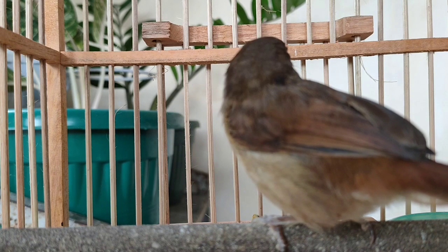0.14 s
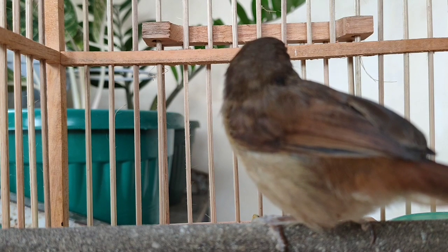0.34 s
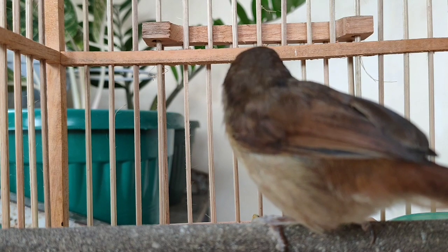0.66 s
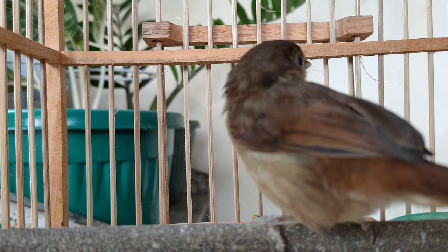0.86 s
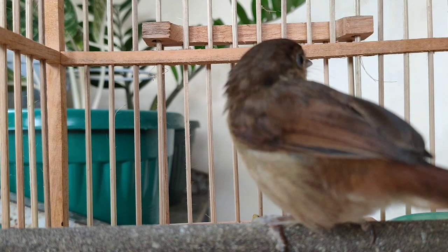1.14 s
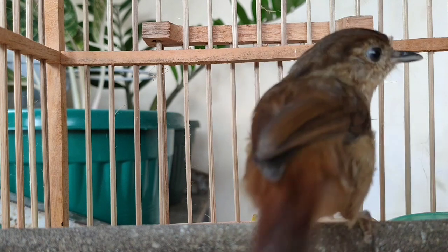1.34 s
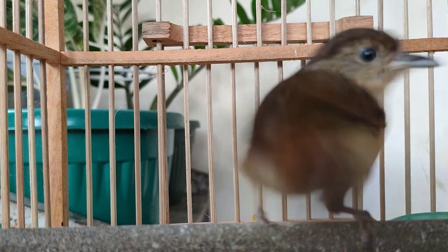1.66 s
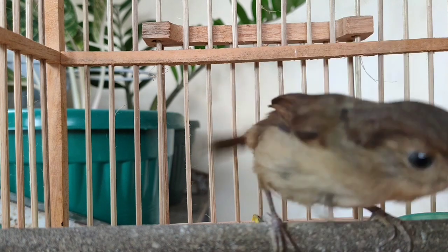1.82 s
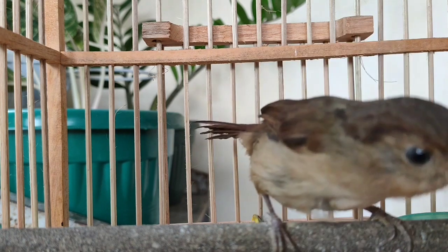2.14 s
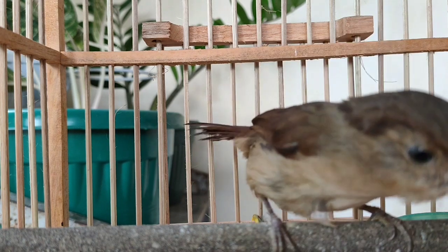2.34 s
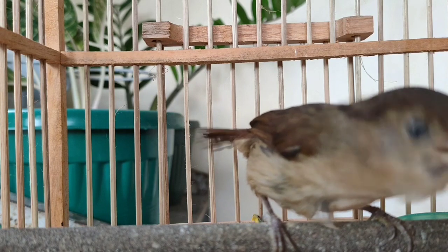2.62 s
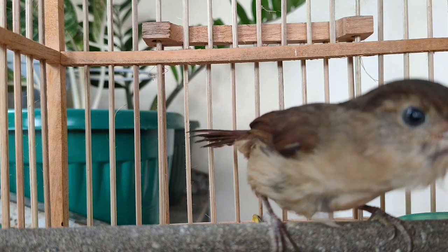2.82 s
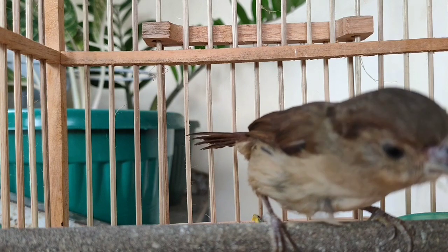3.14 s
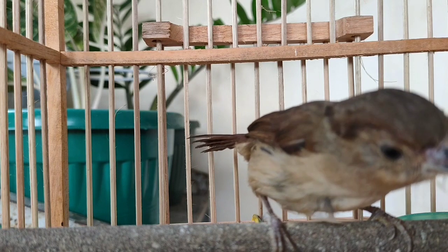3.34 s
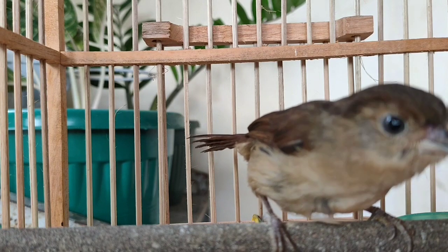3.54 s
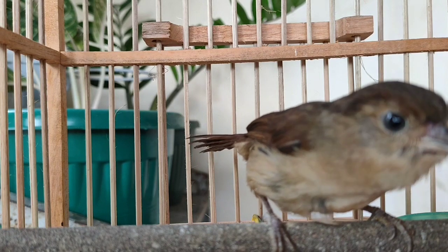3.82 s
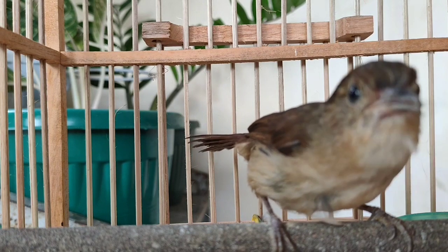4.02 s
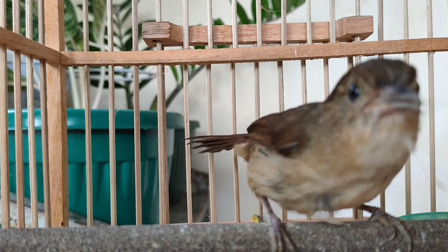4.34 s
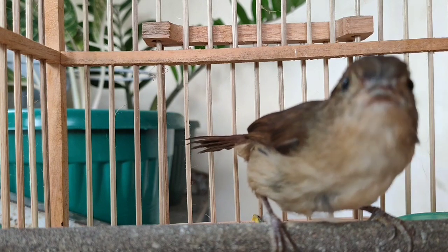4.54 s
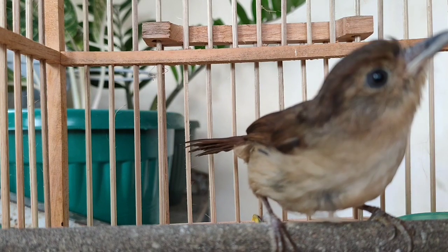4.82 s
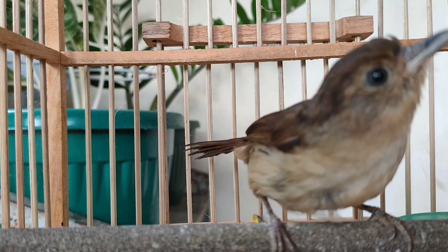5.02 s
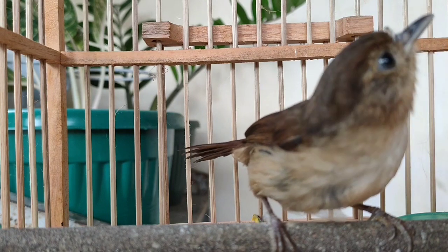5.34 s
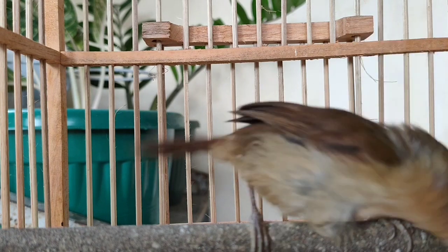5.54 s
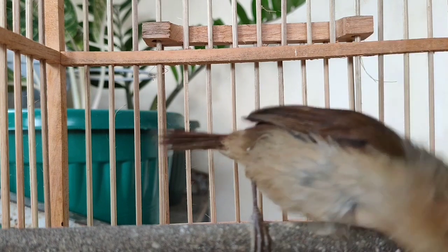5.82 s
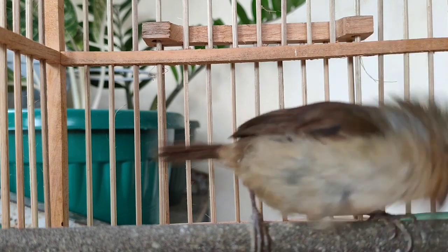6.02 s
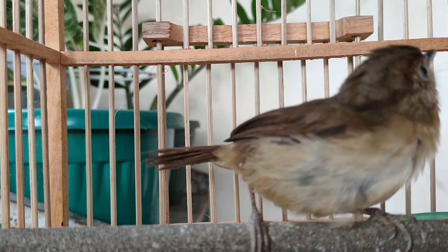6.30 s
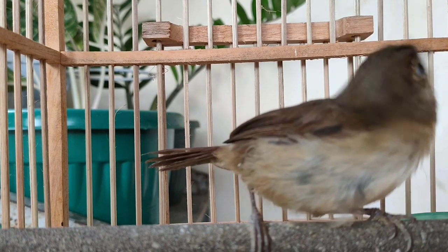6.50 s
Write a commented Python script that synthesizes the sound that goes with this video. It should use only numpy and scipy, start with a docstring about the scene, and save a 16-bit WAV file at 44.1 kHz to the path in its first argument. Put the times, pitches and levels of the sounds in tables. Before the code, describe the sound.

Quiet opening with a faint low background, hoarse calls far away, soft whistles and the bird's feathers and feet shuffling on its perch. Suddenly the close bird sings a dazzling loud rattle ending in two buzzes, pauses, then sings a second, ending in three. The porch answers briefly. Afterwards only muffled regular hammering remains, with tiny cage ticks, the last setting a wire ringing.

```python
"""A small caged bird, a hand's width from the microphone, sings two loud rattling trills that end in buzzes.
Its voice is a gliding tone with two overtones, made directional by the beak and followed by a lingering diffuse
tail. Soft sinking whistles (sines), rustles (shaped noise) and far hoarse calls (period-doubled tones) come
before. Slow hammer blows are low noise with wall resonances; a low tone swells briefly under the first trill.
Noise ticks sound on the cage, the last with a ringing wire, over a faint steady noise."""
import sys
import numpy as np
from scipy import signal
from scipy.fft import rfft, irfft, next_fast_len
from scipy.io import wavfile
from scipy.ndimage import uniform_filter1d, map_coordinates

SR = 44100
rng = np.random.default_rng(int(sys.argv[2]) if len(sys.argv) > 2 else 0)


def to_wav(s):
    """Save 16-bit WAV."""
    ch = np.atleast_2d(s).T  # columns
    pcm = np.round(np.clip(ch, -1, 1) * 32767)  # PCM
    wavfile.write(sys.argv[1], SR, pcm.astype(np.int16))


N = 294147
T = np.arange(N) / SR  # time axis (s)


def syrinx(hz, second_db, third_db, jitter):
    """Harmonic synthesis: a nearly pure tone with two overtones and a slightly unsteady pitch."""
    phase = phase_of(hz * (1 + jitter * wobble(900, len(hz))))
    second = amp(second_db) * np.sin(2 * phase)
    third = amp(third_db) * np.sin(3 * phase)
    return np.sin(phase) + second + third


# Trill notes, each a low slur that leaps into an arch: [leap t/s, slur top f/Hz, relative level/dB]
TRILL_NOTES = [(2.33, 2504, -6.5), (2.377, 2700, -2.5), (2.4444, 3702, 3), (2.514, 3837, 3),
               (2.559, 3272, 1.5), (2.635, 3577, 2.5), (2.68, 3268, .5), (2.755, 3558, 0.5),
               (2.800, 3175, -0.5), (2.871, 3517, 0), (2.915, 2830, -1), (2.991, 3058, -1),
               (3.025, 2571, -2.5), (3.842, 2410, -6), (3.891, 2468, -4.5), (3.940, 2536, -1),
               (4.012, 2645, 0.5), (4.088, 2940, -0.5), (4.135, 2654, -2.5), (4.214, 3084, -1),
               (4.261, 2699, -1), (4.314, 2687, -1.5), (4.397, 3170, 0.5), (4.443, 2984, -1.5),
               (4.481, 2649, -1.5)]
MID_HZ = 3000  # slur top at which the next two lines hold as they stand
SLUR_S, FOOT_HZ, HURRY = .023, 2330, .7  # length, highest starting pitch; power by which higher slurs are quicker
LEAP_HZ, LEAP_SHRINK = 3193, .3  # height of the arch over the slur top; Hz lost per Hz of higher slur
ARCH_DB, FORCED_DB = -15.5, 8.5  # arch against slur; what it gains in a forced note
FORCED_FROM_HZ, FORCED_SPAN_HZ = 3233, 620  # slur tops over which notes become forced
PAUSE_S = .06  # a longer gap between leaps starts a new group of notes
SCOOP_HZ, SCOOP_S = 1295, 0.0038  # the first note of a group scoops up from this far below, this quickly
TURN_S = 3.6  # when the beak turns towards the microphone (s)
FACING_ARCH_DB = -5.5  # the crests of the second trill are softer


def rattle(climb_share=.88, hold=0.0013, arch=.019, rise=0.011, release=0.0029, swell_db=5, droop_db=1):
    """Frequency modulation: each note slurs up and leaps through an arch; only high notes keep force there."""
    voice = np.zeros(N)
    gaps = np.diff([note[0] for note in TRILL_NOTES], prepend=0)
    for (s, top_hz, db), gap in zip(TRILL_NOTES, gaps):
        slur = min(SLUR_S * (MID_HZ / top_hz) ** HURRY, gap - arch)  # waits for the last arch to end
        climb = climb_share * slur
        foot_hz = min(FOOT_HZ, .88 * top_hz)  # notes with a low top start lower
        crest_hz = top_hz + LEAP_HZ - LEAP_SHRINK * (top_hz - MID_HZ)
        arch_db = ARCH_DB + FORCED_DB * ease((top_hz - FORCED_FROM_HZ) / FORCED_SPAN_HZ)
        t = np.arange(-slur - release / 2, arch + release, 1 / SR)  # the leap is at t = 0
        u = np.clip(t / arch, 0, 1)  # progress through the arch
        height = np.sin(np.pi * u ** 0.95)
        base = foot_hz + (top_hz - foot_hz) * ease((t + climb) / (climb - hold)) * (1 - u)
        scoop = SCOOP_HZ * np.exp(-((t - t[0]) / SCOOP_S) ** 2) * (gap > PAUSE_S)
        hz = base - scoop + (crest_hz - (top_hz + foot_hz) / 2) * height
        level = db - swell_db * ease(-t / slur) + arch_db * ease(t / 0.0056) - droop_db * u ** 2
        level = level + FACING_ARCH_DB * height * (s > TURN_S)
        gate = ease((t - t[0]) / rise) * ease((t[-1] - t) / release)
        tone = syrinx(hz, second_db=-35, third_db=-35, jitter=.005)
        add(voice, s + t[0], gate * amp(level + 2.5) * tone)
    return voice


# Buzzes: [first crest t/s, length t/s, first mean f/Hz, last mean f/Hz, relative peak level/dB,
#          overtone level/dB before effort, warble and beak act on it]
BUZZ_NOTES = [(3.046, 0.062, 3800, 4253, 4.5, -15.5), (3.163, .076, 3417, 4810, 3.5, -1.5),
              (4.494, 0.028, 3890, 3686, 1, -25.5), (4.566, .076, 3667, 4837, 4, 2),
              (4.7052, .073, 3607, 4854, 1.5, 4.5)]
WARBLE_HZ = 118.3  # mean warble rate in every buzz
SWING_HZ = 913  # scale of the pitch swing, which widens from 0.77 to 1.34 times this
SWELL_DB_PER_S = 174.5  # the longer a buzz, the more it swells
BUZZ_RELEASE_S = .008  # a buzz stops almost at once
BEAK_HZ, BEAK_HALF_WIDTH_HZ = 7100, 1600  # resonance of the open beak; offset at which its amplitude is half


def buzz(lead=0.0023, peak_at=0.71, throb_db=6.5, brighten=0.94, push_lag=0.15, downstroke_db=4, trough_db=4):
    """Coupled frequency and amplitude modulation: pitch troughs carry the soft start, crests the hard end."""
    voice = np.zeros(N)
    for s, length, first_hz, last_hz, peak_db, over_db in BUZZ_NOTES:
        t = np.arange(-lead, length, 1 / SR)
        u = np.clip(t / length, 0, 1)
        stumble = .3 * wobble(150, len(t))  # uneven warble (rad)
        cycle = 2 * np.pi * WARBLE_HZ * t + stumble
        swing_hz = SWING_HZ * np.cos(cycle) * (0.77 + 0.57 * u)
        hz = first_hz + (last_hz - first_hz) * u ** 1.4 + swing_hz
        effort_db = SWELL_DB_PER_S * length * (ease(u / peak_at) - 1)
        crest_pulse_db = throb_db * (np.cos(cycle - push_lag) - 1) * 1.37 * u
        trough_pulse_db = trough_db * np.cos(cycle) * (1 - u)
        ragged_db = 2 * wobble(700, len(t))
        level = peak_db + effort_db + crest_pulse_db - trough_pulse_db + ragged_db
        beak = 1 / (1 + ((2 * hz - BEAK_HZ) / BEAK_HALF_WIDTH_HZ) ** 2)  # acts on the second harmonic
        second_db = over_db + brighten * effort_db + downstroke_db * np.sin(cycle) + 20 * np.log10(beak)
        gate = ease((t + lead) / .004) * ease((length - t) / BUZZ_RELEASE_S)
        tone = syrinx(hz, second_db, second_db - 17, jitter=.024)
        add(voice, s - lead, gate * amp(level) * tone)
    return voice


def beamed(x, pose):
    """Directivity: the beak sends each frequency to the two ports with its own strength and phase."""
    def response(hz):
        left, right, lead = (along(np.array(pose)[:, [0, k]], hz) for k in range(1, 4))
        return np.array([amp(left) * np.exp(.5j * lead), amp(right) * np.exp(-.5j * lead)])
    return filtered(x, response)


# Throat and beak as heard at the two ports, head turned aside, then beak towards the microphone:
# [f/Hz, left level/dB, right level/dB, left phase lead/rad]
HEAD_ASIDE = [(1560, -37, -33, -8), (2332, -15.5, -15, -0.36), (2780, -21.5, -11.5, -1.5),
              (3080, -6.5, -5.5, 1), (3380, -7, -11, -1), (3880, -7, -7.5, -2.5), (4405, -10, -8.5, 2.5),
              (5400, -1.5, -9.5, -2.5), (6500, -8, -23, 2.5), (6700, 0.5, -6.5, -2.5), (7880, -5.5, 0, 9),
              (13000, -23.5, -8.5, -4.5), (15030, -14, -22, -8)]
HEAD_FACING = [(1500, -37, -20.5, 1.5), (2400, -17.5, -14, -1.36), (2613, -15, -13.5, -2),
               (2902, -21, -4.5, -2.5), (3000, -11, -8.5, 0.36), (3246, -4, -10.5, -1.5),
               (3476, -6, -13.5, -2), (3970, -8.5, -3, -3), (5544, -7.5, -8.5, -2), (6300, -1, -6.5, -4),
               (8500, -16.5, -2, -4.5), (11100, -27.5, -18, 8), (15500, -26, -12.5, -10)]
# Voice as it feeds the reflections and the lingering tail: [f/Hz, level/dB]
SPREAD_TONE = [(1500, -28), (2300, -17), (2700, -13), (3200, -10), (3900, -13.5), (5100, -9.5), (6400, -7.5),
               (7500, -8.5), (9500, -16.5), (12000, -18), (15500, -18.5)]
# Decay of the lingering tail: [f/Hz, time to fall 60 dB t/s]
TAIL_DECAY = [(200, .6), (3000, 0.45), (6000, 0.42), (15000, 0.54)]
# Spectra of the air noise, the fizz of loud notes and the rasp of buzzes: [f/Hz, relative density level/dB per Hz]
AIR_SPECTRUM = [(20, -25.5), (55, -7.5), (120, 0), (500, -6), (1000, -7.5), (1800, 2.5), (4000, -2.5),
                (9000, -6.5), (11000, -27.5), (15600, -23)]
FIZZ_SPECTRUM = [(5000, -10.5), (9000, -3.5), (11000, -11.5), (13000, 0), (14500, -11.5), (15600, 7.5)]
RASP_SPECTRUM = [(2000, -18), (4000, -12), (6800, 7), (9000, -6.5), (11000, -5), (14000, -15.5),
                 (15500, -13.5)]
FIZZ_DB, FIZZ_GROWS = -17, 1.4  # gain of the fizz; the power of the voice with which it grows
RASP_DB, RASP_FROM_HZ = -19, 6000  # rasp against the buzz treble above this frequency


def trills():
    """Direct and reflected sound: air noise follows the voice, loud notes fizz, buzzes rasp, a diffuse tail
    lingers."""
    buzzes = buzz()
    voice = rattle() + buzzes
    near = beamed(voice * (T < TURN_S), HEAD_ASIDE) + beamed(voice * (T >= TURN_S), HEAD_FACING)
    outward = filtered(voice, lambda hz: amp(along(SPREAD_TONE, hz)))
    air = amp(-23.0) * strength(outward) * noise(AIR_SPECTRUM)
    fizz = amp(FIZZ_DB) * strength(outward) ** FIZZ_GROWS * noise(FIZZ_SPECTRUM)
    buzz_treble = filtered(buzzes, lambda hz: hz > RASP_FROM_HZ)
    rasp = amp(RASP_DB) * strength(buzz_treble) * noise(RASP_SPECTRUM)
    hiss = air + fizz + rasp
    spread = outward + 2.1 * hiss
    early = amp(-9.0) * walls(spread)
    late = amp(-12.5) * echo(spread, TAIL_DECAY, onset=0.0013)
    return near + hiss + early + late


# Thin whistle notes: [start t/s, length t/s, level/dB before direct and echo gains]
WHISTLE_NOTES = [(0.738, 0.16, -57.5), (0.985, 0.22, -57.5), (1.243, 0.29, -52.5), (1.566, 0.23, -53),
                 (1.896, 0.15, -59.5)]
WHISTLE_HZ = 3329  # start of each note
REST_HZ, REST_SAG_HZ_PER_S = 3165, 175  # where the first note settles; how that rest sinks


def whistle(settle=0.07):
    """Pitch relaxation: five soft sines each sink to a lower rest than the last, heard mostly off the walls."""
    voice = np.zeros(N)
    for s, length, db in WHISTLE_NOTES:
        t = np.arange(0, length, 1 / SR)
        rest_hz = REST_HZ - REST_SAG_HZ_PER_S * (s - WHISTLE_NOTES[0][0])
        hz = rest_hz + (WHISTLE_HZ - rest_hz) * np.exp(-(t / settle) ** 1.5)
        gate = ease(t / 0.031) * ease((length - t) / .06)
        add(voice, s, amp(db) * gate * np.sin(phase_of(hz)))
    return amp(-4.5) * voice + amp(4.5) * echo(voice, [(3000, 0.55)], onset=.01)


# Feather swishes, then feet shuffling on the perch: [peak t/s, rise t/s, fall t/s, level/dB before flicker]
FEATHER_SWISHES = [(.27, 0.04, 0.44, -71.5), (.74, 0.15, 0.17, -61.5), (1.5, .04, 0.11, -71.5),
                   (1.73, 0.2, 0.25, -62.5)]
FOOT_STEPS = [(1.385, 0.014, 0.036, -87), (1.5, 0.056, 0.14, -76), (1.7, 0.26, .25, -68),
              (1.88, 0.037, 0.23, -64), (2.3, .06, 0.22, -72.5)]
# Spectra of feathers and of shuffling feet: [f/Hz, relative density level/dB per Hz]
FEATHER_SPECTRUM = [(800, -21.5), (2100, -2.5), (3000, -8.5), (4000, -14.5), (6800, 2), (9000, -2.5),
                    (13000, -28), (15500, -32)]
SHUFFLE_SPECTRUM = [(29, -53), (50, -10), (298, -5), (388, -16), (728, -7.5), (1120, -28.5), (2600, -24),
                    (3380, -42), (5720, -120)]
FADE_DB = 15  # a rustle is this much weaker one rise before or one fall after its peak


def swells(events):
    """Gaussian envelope: a gain that rises and falls in a bell around each event."""
    gain = np.zeros(N)
    for s, rise, fall, db in events:
        distance = (T - s) / np.where(T < s, rise, fall)
        gain += amp(db - FADE_DB * distance ** 2)
    return gain


def rustle():
    """Friction noise: feathers brush and feet shuffle as the bird turns on its perch."""
    feathers = swells(FEATHER_SWISHES) * amp(2.6 * wobble(60, N)) * noise(FEATHER_SPECTRUM)
    feet = swells(FOOT_STEPS) * amp(4.8 * wobble(26, N)) * noise(SHUFFLE_SPECTRUM)
    return feathers + feet


# Claws and beak on the cage: [t/s, level/dB before the decay]
CAGE_TICKS = [(5.655, -57.5), (6.055, -60.5), (6.139, -40)]
# Modes of the cage wire: [f/Hz, level/dB before onset and decay, time to fall 60 dB t/s]
WIRE_MODES = [(5680, -50.5, 0.65), (6000, -41.5, 0.87), (6680, -54.5, 0.74), (6400, -46, 0.88),
              (6360, -62, 0.79)]


def cage():
    """Impact and modal ringing: light noise ticks, the last of which sets a wire ringing."""
    out, t = np.zeros((2, N)), np.arange(SR) / SR
    for s, db in CAGE_TICKS:
        scratch = noise([(1500, -18.5), (6000, -1), (15000, -12.5)], size=SR)
        add(out, s, amp(db - 60 * t / 0.035) * ease(t / .004) * scratch)
    for hz, db, t60 in WIRE_MODES:
        shiver = np.array([wobble(160, SR), wobble(160, SR)])  # phase unsteadiness at each port
        mode = np.sin(2 * np.pi * hz * t + 2 * shiver)
        add(out, CAGE_TICKS[-1][0], amp(db - 60 * t / t60) * ease(t / 0.059) * mode)
    return out


# Hammer blows: [t/s, level/dB before the swell and decay]
HAMMER_BLOWS = [(2.47, -53), (2.89, -45), (3.344, -49), (3.70, -46.5), (4.035, -42), (4.365, -40.5),
                (4.745, -41.5), (5.165, -47), (5.622, -40.5), (6.032, -40.5), (6.445, -42.5)]
# Spectrum of the thud: [f/Hz, relative density level/dB per Hz]
THUD_SPECTRUM = [(22, -28.5), (40, -21), (60, -7), (100, -2), (150, -9), (200, -1.5), (320, -1.5),
                 (450, -5.5), (700, -10.5), (1100, -16), (2300, -20.5), (3800, -39), (8000, -37.5),
                 (12000, -65)]
# Resonances between the walls: [f/Hz, relative level/dB]
YARD_MODES = [(193.8, -55), (279.9, -58.5), (317.6, -61), (425.3, -58)]


def hammering(swell=0.079, hold=0.14, t60=0.94, ring_db=49, lag=0.00028):
    """Multipath smearing: every blow takes the same detour between walls, so each is the same soft thud."""
    t = np.arange(SR) / SR
    ring = np.zeros(SR)
    for hz, db in YARD_MODES:
        ring += amp(db + ring_db) * np.sin(2 * np.pi * hz * t + 0.48 * wobble(16, SR))
    envelope = np.minimum(t / swell, 1) * amp(-60 * np.maximum(t - hold, 0) / t60)
    thud = unit(noise(THUD_SPECTRUM, size=SR) + ring) * envelope
    out = np.zeros((2, N))
    for s, db in HAMMER_BLOWS:
        add(out[0], s + lag, amp(db) * thud[0])  # the left port is farther away
        add(out[1], s, amp(db) * thud[1])
    return out


# Far animal calls: [start t/s, length t/s, first f/Hz, last f/Hz, level/dB before flutter and room,
#                    gain of the overtone set/dB]
FAR_CALL_NOTES = [(0, .28, 712, 660, -60.5, 3), (0.682, 0.16, 954, 867, -60, -23),
                  (1.717, 0.26, 747, 715, -62, -18), (2.1, .2, 723.5, 775, -78.5, -25)]
# Overtones of the far calls: [multiple of the pitch, level/dB before the overtone gain]
CALL_OVERTONES = [(1.5, -9), (2, -9), (2.5, -15.5), (3, -3.5), (3.5, -18.5)]
HOARSE, FLUTTER_DB = .016, 4.5  # scale of the unsteadiness of pitch (share) and of level


def far_calls():
    """Period doubling: distant hoarse calls carry lines between their harmonics, heard mostly as echo."""
    voice = np.zeros(N)
    for s, length, first_hz, last_hz, db, over_db in FAR_CALL_NOTES:
        t = np.arange(0, length, 1 / SR)
        glide_hz = first_hz + (last_hz - first_hz) * (t / length) ** 0.62
        phase = phase_of(glide_hz * (1 + HOARSE * wobble(230.0, len(t))))
        overtones = sum(amp(level) * np.sin(k * phase) for k, level in CALL_OVERTONES)
        flutter = amp(FLUTTER_DB * wobble(170, len(t)))
        gate = ease(t / 0.0067) * ease((length - t) / 0.026) * flutter
        add(voice, s, amp(db) * gate * (np.sin(phase) + amp(over_db) * overtones))
    return 0.28 * voice + echo(voice, [(1000, 0.28)], onset=0.0047)


# A brief low hum: [start t/s, length t/s, f/Hz, peak level/dB]
HUM_TONES = [(2.74, .17, 208, -53)]


def hum():
    """Pure tone in a half-sine envelope: a low sound swells and fades under the first trill."""
    out = np.zeros(N)
    for s, length, hz, db in HUM_TONES:
        envelope = np.sin(np.pi * np.clip((T - s) / length, 0, 1))
        out += amp(db) * envelope * np.sin(2 * np.pi * hz * T)
    return out


# Spectrum of the background: [f/Hz, relative density level/dB per Hz]
FLOOR_SPECTRUM = [(20, -2.5), (50, -2.5), (110, -12.5), (250, -13.5), (1000, -31.5), (4000, -27.5),
                  (9000, -30.5), (16000, -38.5)]


def background():
    """Stationary noise: a faint, mostly low sound that never changes level."""
    return amp(-75.5) * noise(FLOOR_SPECTRUM)


def walls(x, count=14, nearest=.004, farthest=0.044, t60=0.11):
    """Early reflections: separate weak copies from the floor and nearby walls, different at each port."""
    delays = rng.uniform(nearest, farthest, (2, count))
    taps = np.zeros((2, SR // 4))
    for port, delay in enumerate(delays):
        taps[port, (delay * SR).astype(int)] = amp(-60 * delay / t60) * rng.choice([-1, 1], count)
    taps = taps / np.linalg.norm(taps, axis=1, keepdims=True)
    return signal.fftconvolve(x, taps, axes=1)[:, :N]


def echo(x, decay, onset):
    """Reverberation: a diffuse stereo answer of walls in which each frequency dies at its own speed."""
    hz, t, z = signal.stft(rng.standard_normal((2, SR)), SR, nperseg=256)
    fading = z * amp(-60 * t / along(decay, hz)[:, None])
    tail = signal.istft(fading, SR, nperseg=256)[1]
    tail = tail * ease(np.arange(tail.shape[1]) / SR / onset)
    return signal.fftconvolve(np.atleast_2d(x), tail / np.linalg.norm(tail[0]), axes=1)[:, :N]


# Stereo width of diffuse sound: [f/Hz, side over mid amplitude ratio]
DIFFUSE_WIDTH = [(60, 0.47), (250, 0.14), (500, 0.43), (1500, 0.72), (5000, 0.97)]


def noise(spectrum, size=N):
    """Diffuse field: coloured stereo noise of rms 1, nearly mono in the bass."""
    mid, side = filtered(rng.standard_normal((2, size)), lambda hz: amp(along(spectrum, hz)))
    side = filtered(side, lambda hz: along(DIFFUSE_WIDTH, hz))
    return unit(np.array([mid + side, mid - side]))


def strength(x):
    """Envelope detection: running rms of a mono sound."""
    return np.sqrt(np.abs(uniform_filter1d(x ** 2, size=100)))


def filtered(x, response):
    """Linear filtering: x times a complex response of frequency."""
    n = x.shape[-1]
    m = next_fast_len(n + 8192)
    return irfft(rfft(x, m) * response(np.fft.rfftfreq(m, 1 / SR)), m)[..., :n]


def wobble(rate, size):
    """Band-limited randomness: a smooth random curve, rate knots a second."""
    knots = rng.standard_normal(int(size * rate / SR) + 4)
    return map_coordinates(knots, [np.arange(size) * rate / SR])


def phase_of(hz):
    """Phase (rad) as the running integral of frequency."""
    return 2 * np.pi * np.cumsum(hz) / SR


def along(points, hz):
    """Logarithmic interpolation of (Hz, value) points along frequency."""
    f, v = np.transpose(points)
    return np.interp(np.log(hz + 1), np.log(f + 1), v)


def ease(u):
    """Raised-cosine transition from 0 to 1."""
    return np.sin(np.pi / 2 * np.clip(u, 0, 1)) ** 2


def amp(db):
    """Decibel law: level to amplitude ratio."""
    return 10 ** (np.asarray(db) / 20)


def unit(x):
    """Power normalization to rms 1."""
    return x / np.sqrt(np.mean(x ** 2) + 1e-20)


def add(track, s, sound):
    """Superposition: mix a sound into a track at time s."""
    i = max(round(s * SR), 0)
    track[..., i:i + sound.shape[-1]] += sound[..., :max(N - i, 0)]


def scene():
    """Superposition of all sources, from the near bird to the background."""
    bird = trills() + whistle() + rustle() + cage()
    return bird + hammering() + far_calls() + hum() + background()


TOP_HZ = 15900  # band limit


def record(dry, hardness=8):
    """Saturation and band limiting: the loudest notes flatten near full scale, then the top is cut."""
    flattened = dry / (1 + np.abs(dry) ** hardness) ** (1 / hardness)
    return filtered(flattened, lambda hz: hz < TOP_HZ)


dry = scene()
out = record(dry)
to_wav(out)
```